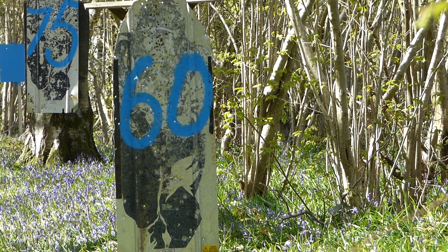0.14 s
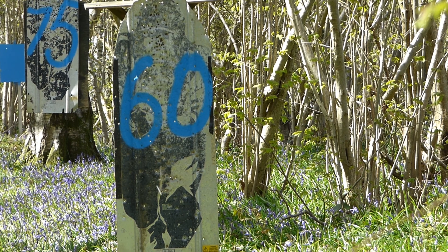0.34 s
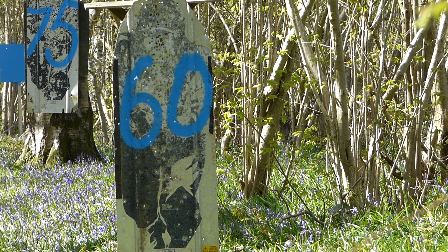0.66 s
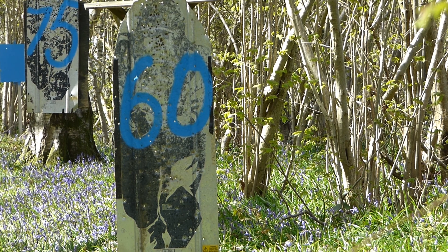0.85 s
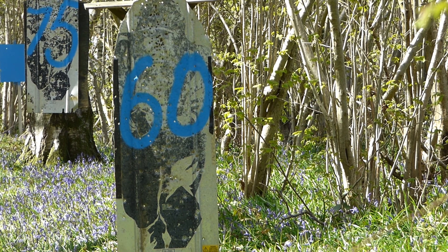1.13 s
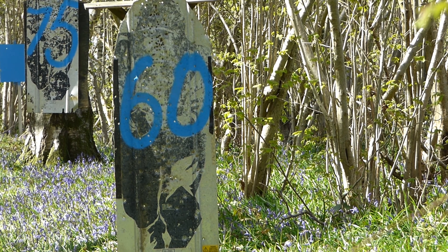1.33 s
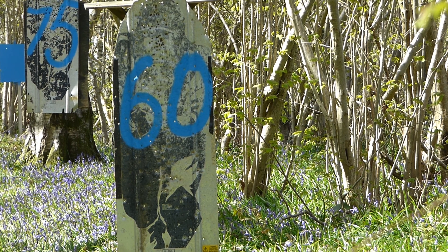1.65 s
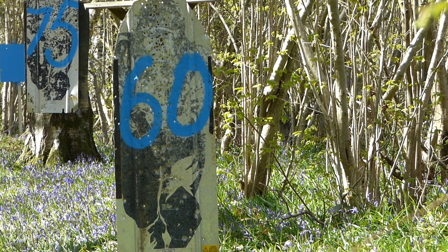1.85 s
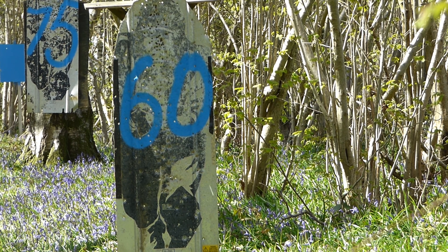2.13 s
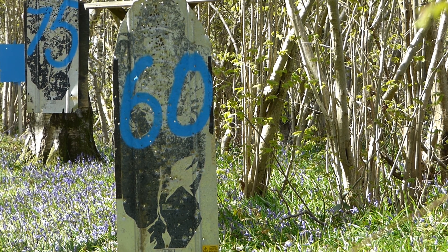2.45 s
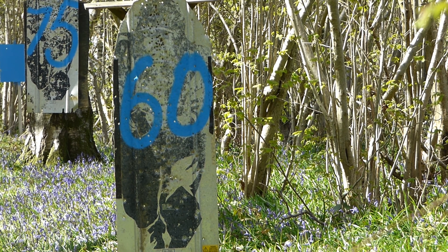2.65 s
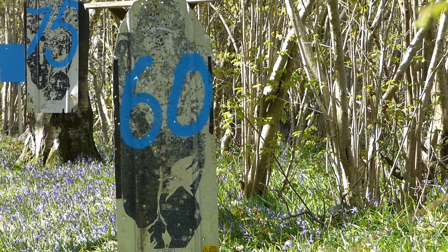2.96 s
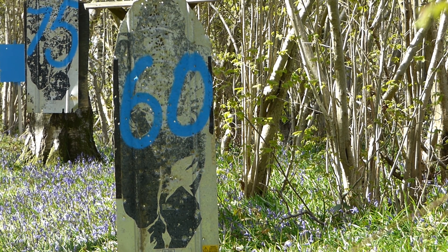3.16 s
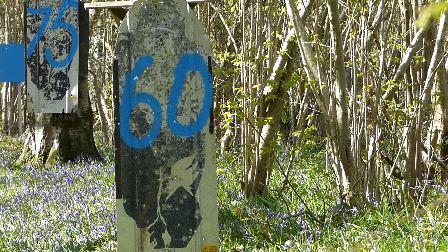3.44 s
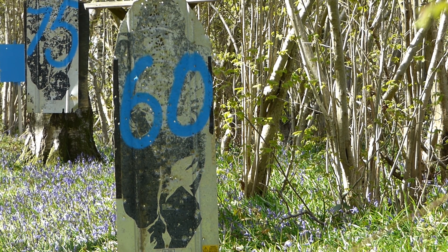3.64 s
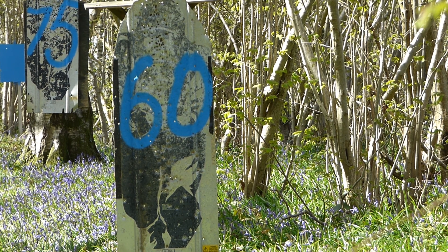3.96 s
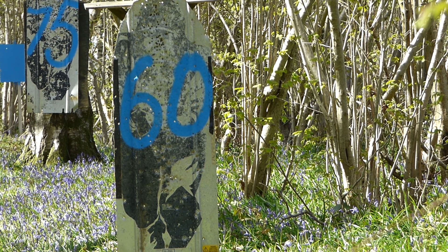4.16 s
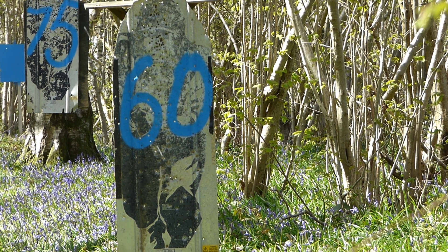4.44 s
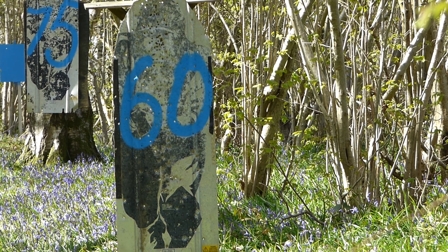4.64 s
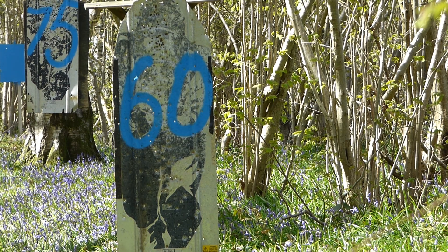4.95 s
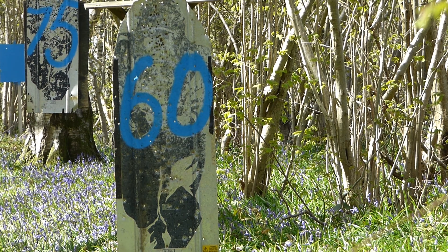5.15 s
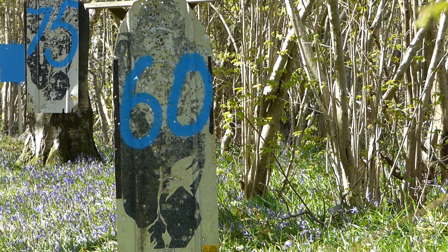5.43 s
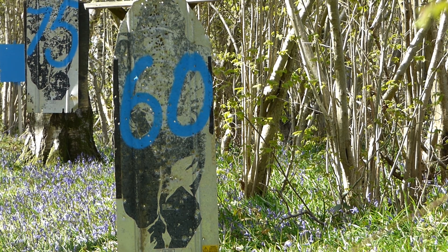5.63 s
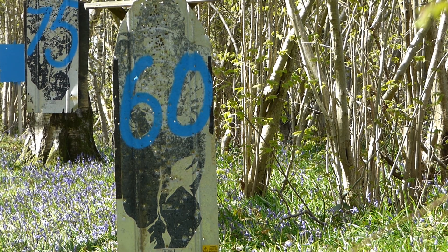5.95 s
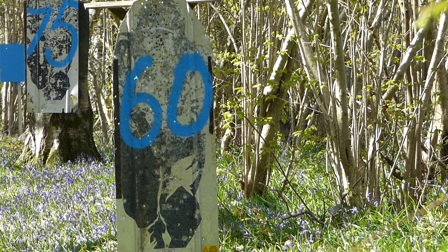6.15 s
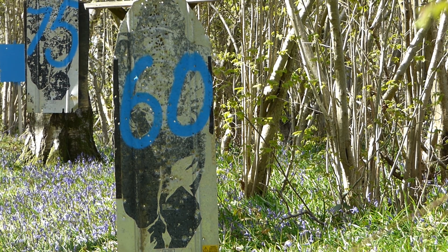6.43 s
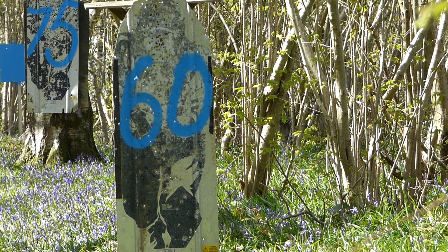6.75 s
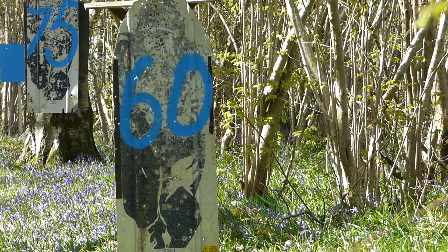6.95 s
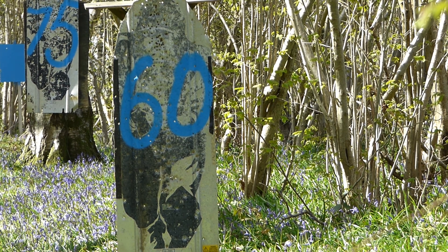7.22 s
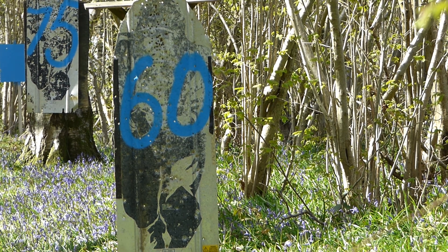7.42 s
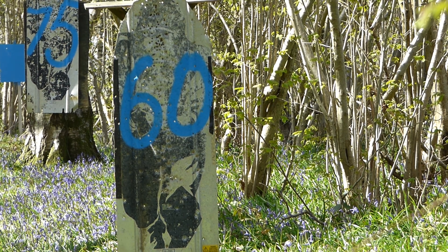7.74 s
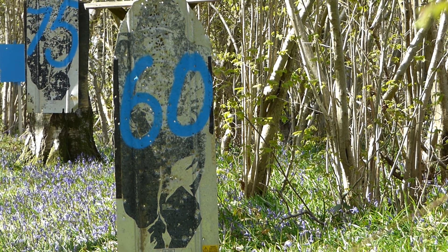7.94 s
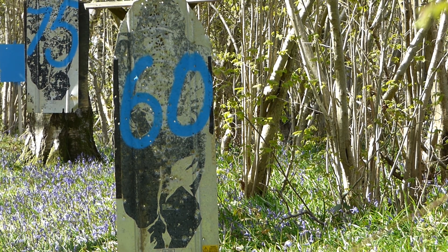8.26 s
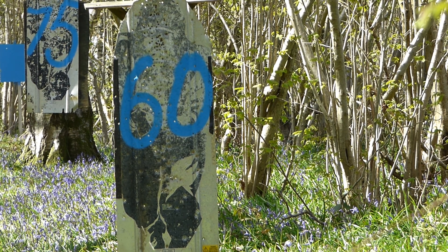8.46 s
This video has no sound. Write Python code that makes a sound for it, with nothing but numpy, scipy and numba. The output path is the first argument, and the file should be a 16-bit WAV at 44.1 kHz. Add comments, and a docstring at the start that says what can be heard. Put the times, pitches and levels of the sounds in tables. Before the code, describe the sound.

Close, bright pellet knocks echo off tree trunks while a toy gun's motor rattles further away, small birds whistle and a far engine drones low.

```python
"""Airsoft pellets crack against a target board close to the microphone, and the trunks of a wood scatter
each crack: noise shaped by the board's modes, then decaying echoes.
Further off an electric airsoft gun rattles in short bursts of noise clacks, and small birds whistle
falling notes as gliding sines. Behind it all lie the wash of distant traffic, made of filtered noise,
and the drone of a far engine, a sinking sine over a low noise rumble."""
import sys
import numpy as np
from scipy import signal
from scipy.fft import rfft, irfft
from scipy.io import wavfile
from scipy.ndimage import uniform_filter1d, minimum_filter1d
from numba import njit

SR = 44100
rng = np.random.default_rng(int(sys.argv[2]) if len(sys.argv) > 2 else 0)


def persist_wave(psi):
    """Save psi, clipped to +-1, as 16-bit WAV."""
    counts = np.round(np.clip(psi, -1, 1) * 32767).astype(np.int16)
    wavfile.write(sys.argv[1], SR, np.atleast_2d(counts).T)


N = 378819
T = np.arange(N) / SR  # s
FREQ = np.maximum(np.arange(N // 2 + 1) * SR / N, 1)  # Hz
GLIDE_SHARE = .26  # part of a whistled note's length in which half its glide is done


def undb(db):
    """Decibels to gain."""
    return 10 ** (np.asarray(db) / 20)


def unit(x):
    """Scale to rms 1."""
    return x / np.sqrt(np.mean(x ** 2))


def spectrum(points):
    """Join (Hz, value) points on a log-frequency axis."""
    hz, value = np.transpose(points)
    return np.interp(np.log(FREQ), np.log(hz), value)


def resonance(hz, width_hz):
    """Response of one mode, gain 1 at its centre."""
    return 1 / (1 + 1j * (FREQ / hz - hz / FREQ) * hz / width_hz)


def colour(x, response):
    """Filter a sound so that white noise would keep its level."""
    power = np.mean(np.abs(response) ** 2)
    return irfft(rfft(x) * response / np.sqrt(power), N)


def noise(response):
    """Noise of rms 1 with the given frequency response."""
    return unit(colour(rng.standard_normal(N), response))


def walk(rate):
    """Slow random drift with a spread of 1; most of it lies below the rate in Hz."""
    return noise(np.exp(-(FREQ / rate) ** 2))


def stereo(mid, side):
    """Left and right from mid and side."""
    return np.array([mid + side, mid - side])


def pair(size, response, side_db, grain=1):
    """A short stereo noise as spectra of left and right, with the frequency of each bin."""
    hz = np.arange(size // 2 + 1) * SR / size
    shape = unit(np.interp(hz, FREQ, response))
    mid, side = rfft(grain * rng.standard_normal((2, size))) * shape
    side_gain = undb(np.interp(hz, FREQ, np.broadcast_to(side_db, FREQ.shape)))
    return stereo(mid, side * side_gain), hz


def add(out, sound, start):
    """Mix a sound in at a time in seconds."""
    i = int(round(start * SR))
    a, b = max(i, 0), min(i + sound.shape[-1], N)
    if b > a:
        out[..., a:b] += sound[..., a - i:b - i]


def scatter(response, side_db, grain_db=0.5, build_s=0.0013):
    """Echoes from countless trunks build up at once and die away, the highest treble first."""
    # Ring time among the trees. Each row: frequency in Hz, time to fall by 60 dB in s.
    wood_t60 = [(1000, 0.45), (2500, 0.67), (4500, 0.62), (7000, 0.49), (10000, 0.41), (15000, 0.27)]
    size = 2 ** 16
    # the strength of the echoes varies slightly from one 32-sample step to the next
    steps_db = grain_db * np.repeat(rng.standard_normal(size // 32), 32)
    bins, hz = pair(size, response, side_db, unit(undb(steps_db)))
    t = T[:size]
    centres, t60s = np.transpose(wood_t60)
    echoes = 0
    for row, t60 in zip(np.eye(len(t60s)), t60s):
        share = np.interp(hz, centres, row)  # overlapping bands that add up to 1
        echoes = echoes + irfft(bins * share) * np.exp(-np.log(1000) * t / t60)
    return echoes * (1 - np.exp(-t / build_s))


def wood(x, side_db):
    """A far sound as the trees return it, with about the same energy."""
    echoes = scatter(np.ones(len(FREQ)), side_db)
    echoes = echoes / np.sqrt(np.sum(echoes ** 2) / 2)
    return signal.fftconvolve(x[None], echoes, axes=1)[:, :N]


def air(dip_hz=392, dip_width_hz=50, dip_depth=1.0, level_db=-42.5, swell_db=-0.5):
    """Distant traffic as shaped noise, a little to the left, with a narrow hollow in its low middle."""
    # Colour of traffic and air. Each row: frequency in Hz, relative level in dB per Hz.
    wash_colour = [(25, -22.5), (50, -14), (85, -0.5), (150, -8), (330, -5), (500, -3.5), (700, 0),
                   (1020, 2.5), (1500, -7), (2200, -19), (3200, -30), (5000, -34.5), (10000, -38),
                   (15500, -45.5)]
    # Width of the wash. Each row: frequency in Hz, side minus mid in dB.
    wash_side = [(60, -17.5), (130, -18.5), (280, -17), (600, -9), (1200, -6), (3000, -5), (12000, -0.5)]
    # Its lean to one side. Each row: frequency in Hz, left minus right in dB.
    wash_pan = [(100, 0), (280, -0.2), (550, 1), (1100, 4.5), (3000, 2), (12000, 0)]
    hollow = np.abs(1 - dip_depth * resonance(dip_hz, dip_width_hz))
    response = undb(spectrum(wash_colour)) * hollow
    mid, side = rfft(rng.standard_normal((2, N)))
    pan = undb(spectrum(wash_pan) * np.array([[.5], [-.5]]))
    wash = irfft(stereo(mid, side * undb(spectrum(wash_side))) * response * pan, N)
    return unit(wash) * undb(level_db + swell_db * walk(3.7))


def engine(waver=.012, fading_db=1.0):
    """A far engine's firing tone sinks and swells, and a low rumble swells once."""
    # Swells of the tone. Each row: centre in seconds, half-width in seconds, level in dB.
    tone_swells = [(6.15, 0.44, -52), (6.9, 1.75, -62), (8.25, .22, -52.5)]
    firing_hz, drop_hz, pass_s, turn_s = 113.3, 14, 7.1, 2.3  # the rate sinks as the engine goes by
    hz = firing_hz - drop_hz * (1 + np.tanh((T - pass_s) / turn_s)) / 2
    phase = np.cumsum(hz * (1 + waver * walk(8))) / SR  # in turns
    gain = undb(-62)
    for centre, half_width, db in tone_swells:
        gain = gain + undb(db) * np.exp(-((T - centre) / half_width) ** 2)
    tone = np.sqrt(2) * np.sin(2 * np.pi * phase) * gain * undb(fading_db * walk(5.5))
    low = np.abs(resonance(100, 50)) ** 2 + undb(-7.0) * np.abs(resonance(180, 65.6)) ** 2
    peak_s, peak_db, rise_db_per_s, fall_db_per_s = 6.52, -45, 33.5, 66
    rumble_db = peak_db - np.maximum(rise_db_per_s * (peak_s - T), fall_db_per_s * (T - peak_s))
    return tone + stereo(noise(low), undb(-4.5) * noise(low)) * undb(rumble_db)


def songs():
    """The near bird repeats its song at slightly different speeds; rows as bird() reads them."""
    # Two held notes and three falling ones. Each row: seconds into the song, length in seconds,
    # start in Hz, end in Hz, level in dB.
    song_notes = [(0, .26, 6950, 6780, -46.5), (0.313, .18, 6690, 6924, -45), (.56, .14, 6500, 5160, -42.5),
                  (.748, .15, 6560, 5210, -45.5), (.905, .125, 4720, 3980, -47.5)]
    # Each singing. Each row: start in seconds, level in dB added to the notes, time stretch.
    singings = [(5.987, -.5, 1.024), (7.513, 0, .999)]
    notes = []
    for start, db, stretch in singings:
        for lag, length, from_hz, to_hz, note_db in song_notes:
            note_start, glide_s = start + stretch * lag, GLIDE_SHARE * length
            notes.append((note_start, stretch * length, from_hz, to_hz, glide_s, db + note_db))
    return notes


def slur(start, hz, db, fall_hz=1070):
    """One note that falls onto its pitch."""
    length_s, glide_s = 0.16, 0.045  # half the fall is done after glide_s
    return start, length_s, hz + fall_hz, hz, glide_s, db


def trill(count=6, note_s=.07, fall=.02, db=-58.5):
    """Evenly spaced short notes, each dipping a little, in a run that sags and lifts again."""
    # Pitch along the run. Each row: time in seconds, pitch in Hz.
    run_pitch = [(3.54, 4456), (3.74, 4320), (3.92, 4436), (4.07, 4530)]
    s, hz = np.transpose(run_pitch)
    starts = np.linspace(s[0], s[-1], count)
    pitches = np.interp(starts, s, hz)
    return [(start, note_s, pitch * (1 + fall), pitch, GLIDE_SHARE * note_s, db)
            for start, pitch in zip(starts, pitches)]


def chatter(count=5, span_s=(3.55, 4.65), range_hz=(3093, 3440), fall_hz=328, db=-66):
    """A distant bird drops low slurs at loose intervals, at random pitches within a range."""
    when, pitch = rng.random((count, 2)).T
    starts = np.interp(np.arange(count) + when, [0, count], span_s)
    pitches = np.interp(pitch, [0, 1], range_hz)
    return [slur(start, hz, db, fall_hz) for start, hz in zip(starts, pitches)]


def bird(waver=0.0038, flutter_db=3, direct_db=-3, echo_db=-3, near_db=-42, distance_slope=0.29):
    """Pure whistles slide to a held pitch and linger among the trees; faint ones have more echo."""
    # Single falling notes of birds further off. Each row: start in seconds, end pitch in Hz, level in dB.
    far_slurs = [(1.82, 7100, -70.5), (1.99, 7150, -71), (2.865, 6950, -58.5), (3.19, 5410, -54.5),
                 (3.24, 5020, -58), (3.371, 5350, -54), (4.215, 6820, -59.5), (4.538, 5450, -57.5)]
    song, direct = np.zeros(N), np.zeros(N)
    drift, flutter = walk(94.4), undb(flutter_db * walk(37))
    notes = songs() + [slur(*row) for row in far_slurs] + trill() + chatter()
    for start, length, from_hz, to_hz, glide_s, db in notes:
        t = T[:int(length * SR)]
        glide_hz = to_hz + (from_hz - to_hz) / (1 + (t / glide_s) ** 3)
        hz = glide_hz * (1 + waver * np.interp(start + t, T, drift))
        swell = np.abs(np.sin(np.pi * t / length))
        note = undb(db) * swell * np.sqrt(2) * np.sin(2 * np.pi * np.cumsum(hz) / SR)
        add(song, note, start)
        add(direct, note * undb(direct_db + distance_slope * (db - near_db)), start)
    return direct * flutter + undb(echo_db) * wood(song * flutter, side_db=-7.0)


def gun(clack_s=0.0028, wind_up_s=0.092, wind_up_db=-14, loaded_db=-2, whirr_db=-18, rattle_db=-11,
        latch_db=-1, echo_db=-2, pan_db=1.5):
    """The motor whirrs up, then piston and gears clack through each cycle and rattle the casing."""
    # Bursts. Each row: first shot in seconds, level in dB, number of shots.
    bursts = [(3.003, -33.5, 3), (5.531, -33.5, 3), (6.3105, -34, 3), (7.0495, -33, 1), (.5755, -33, 1)]
    # One gearbox cycle. Each row: seconds after the piston slams, level in dB added to the burst's.
    cycle = [(0, 2), (0.019, -0.5), (.033, -4.5)]
    # Colour of the clacks and rattle. Each row: frequency in Hz, relative level in dB.
    gun_colour = [(700, -10.5), (1700, -4.5), (2600, -10.5), (3900, 2.5), (4330, -5.5), (4850, 6),
                  (5700, -6.5), (7500, -12), (10500, -17.5), (14500, -46)]
    # Colour of the bare motor and gear teeth. Each row: frequency in Hz, relative level in dB.
    gear_colour = [(800, -16), (1900, -2), (2800, -2), (4600, -0.5), (6000, -4.5), (8500, -7.5),
                   (11000, -13), (14500, -27)]
    shot_gap_s = .0735
    latch_s = 0.082  # the gears drop back on their latch this long after the last shot
    clacks, whirr, rattle = np.zeros(N), np.zeros(N), np.zeros(N)
    clack = np.exp(-T[:SR // 20] / clack_s)
    for start, db, count in bursts:
        shots = start + shot_gap_s * np.arange(round(count))
        for shot in shots:
            for lag, part_db in cycle:
                add(clacks, undb(db + part_db) * clack, shot + lag)
        stop = shots[-1] + latch_s
        add(clacks, undb(db + latch_db) * clack, stop)
        load_times = [start - wind_up_s, start, start + 0.012, stop - .05, stop]
        load_db = np.interp(T, load_times, [wind_up_db, loaded_db, 0, 0, -9])
        running = undb(db + load_db) * (T > start - wind_up_s) * (T < stop)
        whirr += undb(whirr_db) * running
        rattle += undb(rattle_db) * running * (T > start)
    uneven_rattle = rattle * undb(2.2 * walk(150))
    force = np.hypot(clacks, uneven_rattle) * rng.standard_normal(N)
    dry = colour(force, undb(spectrum(gun_colour))) + whirr * noise(undb(spectrum(gear_colour)))
    direct = dry * undb([[pan_db], [-pan_db]])  # louder on the left
    return direct + undb(echo_db) * wood(dry, side_db=-4.5)


def pellets(crack_width_hz=6500, mode_width_hz=200, ripple_db=4.0, rise_s=0.000292, contact_s=0.0015,
            crack_body_db=-10, crack_side_db=-6, echo_focus=0.46, echo_mode=0.45, thump_hz=4500,
            distance_slope=.2):
    """A hard pellet briefly shakes the board's dense treble modes; the wood carries the ring on."""
    # Hits on the board. Each row: start in seconds, echo level in dB, squareness from 0 glancing to
    # 1 head-on, strongest mode in Hz, strength of the board's body in dB.
    hits = [(-.035, -27, 0.62, 6940, 0), (.423, -50.5, 1, 7240, 5), (0.5838, -24, .08, 10200, 5.5),
            (0.646, -20.5, 0.24, 8900, .5), (2.334, -57.5, .1, 8700, -7), (2.411, -56.5, .1, 8000, 0),
            (4.562, -66, .3, 8800, -1.5), (4.6795, -19, 0.94, 8300, -4.5),
            (4.7515, -21.5, 0.57, 7660, -1.5), (7.118, -19.5, 0.76, 10680, 1),
            (7.9819, -21.5, 0.97, 8040, -9)]
    # Dense treble modes of the board. Each row: frequency in Hz, relative level in dB.
    board_treble = [(700, -33), (2600, -14), (4300, -19), (5900, -5.5), (7400, -3.5), (9300, -3.5),
                    (11500, -4), (13600, -6.5), (14800, -7.5), (16500, -25)]
    # Its lower modes. Each row: centre in Hz, width in Hz, relative level in dB.
    board_modes = [(1230, 360, -10), (1880, 310, -10.5), (3070, 330, -12), (4000, 330, -5.5),
                   (5110, 800, -5.5)]
    # How unlike the two microphones hear a hit. Each row: frequency in Hz, side minus mid in dB.
    hit_side = [(1000, -9), (2500, -10.5), (5000, -8.5), (9000, -7.5), (13500, -4.5)]
    # from a glancing to a head-on hit the crack gets shorter and louder, and one mode stands out
    glancing_t60_s, head_on_t60_s = 0.1, .012
    glancing_crack_db, head_on_crack_db = 3.5, 15  # over the echo
    glancing_mode_db, head_on_mode_db = -6, 10
    near_hit_db, crack_hz = -19.5, 10400

    out, t = np.zeros((2, N)), T[:SR // 10]
    treble, side_db = undb(spectrum(board_treble)), spectrum(hit_side)
    low_modes = sum(np.abs(undb(db) * resonance(hz, width)) ** 2 for hz, width, db in board_modes) ** .5
    grid = np.arange(0, SR / 2, 90)  # Hz
    for start, db, square, mode_hz, body_db in hits:
        t60 = glancing_t60_s * (head_on_t60_s / glancing_t60_s) ** square
        mode_db = glancing_mode_db + square * (head_on_mode_db - glancing_mode_db)
        # fainter hits are further off, and their crack stands out less from the echo
        over_echo_db = glancing_crack_db + square * (head_on_crack_db - glancing_crack_db)
        crack_db = db + over_echo_db + distance_slope * (db - near_hit_db)
        # each spot wakes the modes unevenly and lets one stand out, which draws the crack towards it
        focus = np.abs(resonance(np.sqrt(crack_hz * mode_hz), crack_width_hz))
        ripple = undb(ripple_db * np.interp(FREQ, grid, rng.standard_normal(len(grid))))
        mode = np.hypot(1, undb(mode_db) * np.abs(resonance(mode_hz, mode_width_hz)))
        # the lowest modes depend most on where the pellet lands
        body = low_modes * undb(body_db / (1 + (FREQ / thump_hz) ** 4))
        direct = ripple * np.hypot(treble * mode * focus ** 2, body * undb(crack_body_db))
        ring = irfft(pair(len(t), direct, side_db + crack_side_db)[0], len(t))
        decay = np.exp(-np.log(1000) * np.maximum(t - contact_s, 0) / t60)
        fade = (1 - np.exp(-t / rise_s)) * decay
        crack = unit(ring * fade) * np.sqrt(np.mean(fade ** 2))
        add(out, undb(crack_db) * crack, start)
        # the trees gather what the board sends in all directions, a more even colour
        radiated = ripple * np.hypot(treble * mode ** echo_mode * focus ** echo_focus, body)
        add(out, undb(db) * scatter(radiated, side_db), start)
    return out


def scene():
    """Target, gun, birds and background together."""
    return pellets() + gun() + bird() + engine() + air()


@njit
def peak_hold(x, release):
    """Follow each peak at once and let go slowly."""
    held, e = np.empty(len(x)), 0.
    for i in range(len(x)):
        e = max(x[i], e * release)
        held[i] = e
    return held


def record(dry, ceiling=0.84, release_s=.35, top_hz=15650):
    """A limiter catches the loudest cracks and briefly ducks the background; the top is cut."""
    held = peak_hold(np.max(np.abs(dry), axis=0), np.exp(-1 / (release_s * SR)))
    needed_gain = ceiling / np.maximum(held, ceiling)
    gain = uniform_filter1d(minimum_filter1d(needed_gain, size=128), size=128)
    top_cut = signal.ellip(8, .2, 70, top_hz, fs=SR, output="sos")
    return signal.sosfilt(top_cut, dry * gain)


dry = scene()
out = record(dry)
persist_wave(out)
```